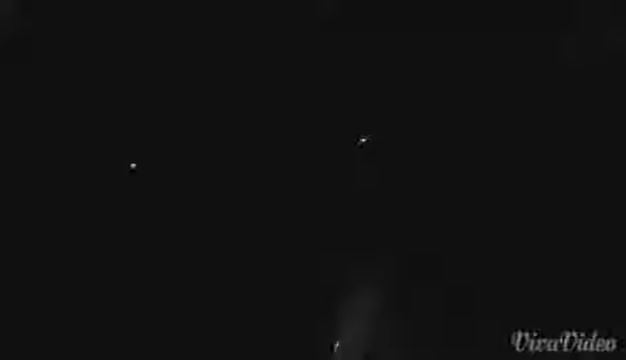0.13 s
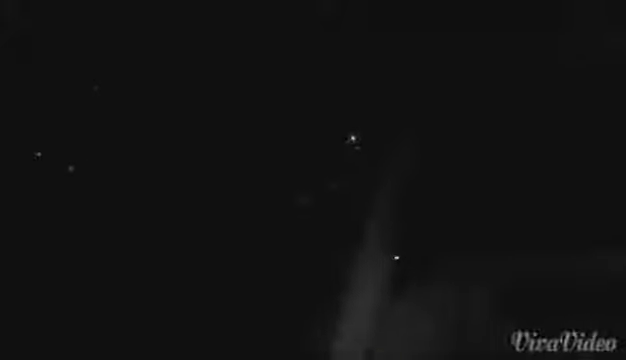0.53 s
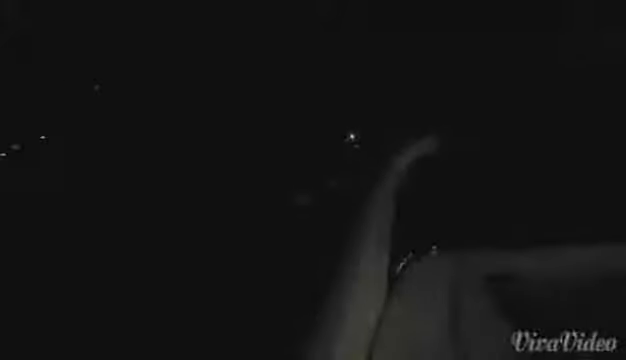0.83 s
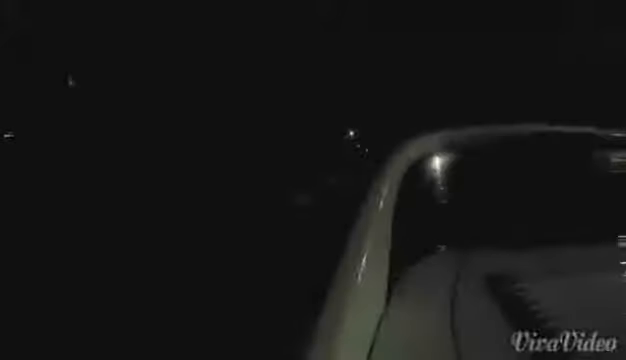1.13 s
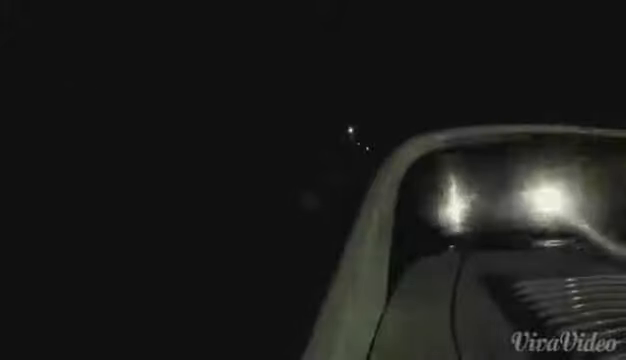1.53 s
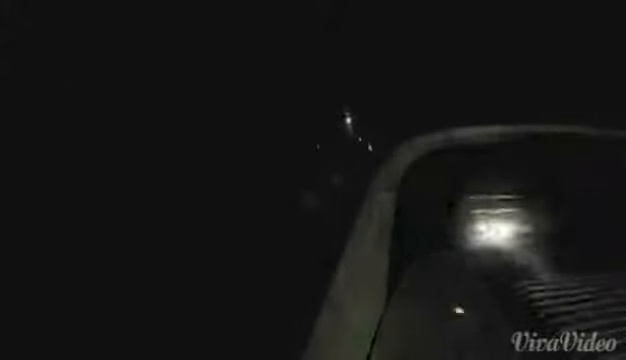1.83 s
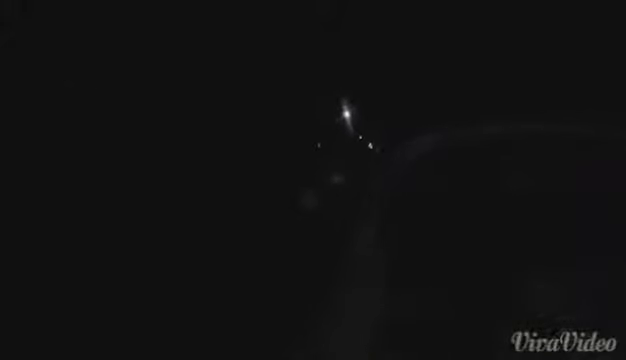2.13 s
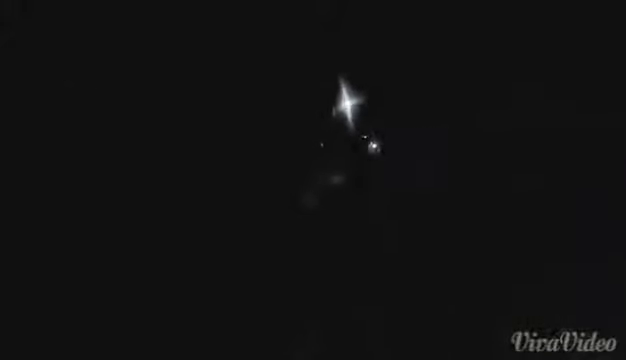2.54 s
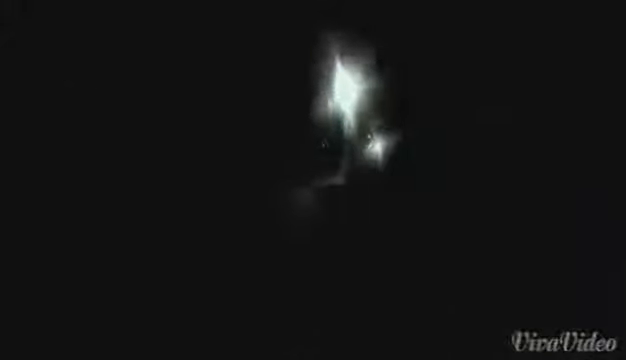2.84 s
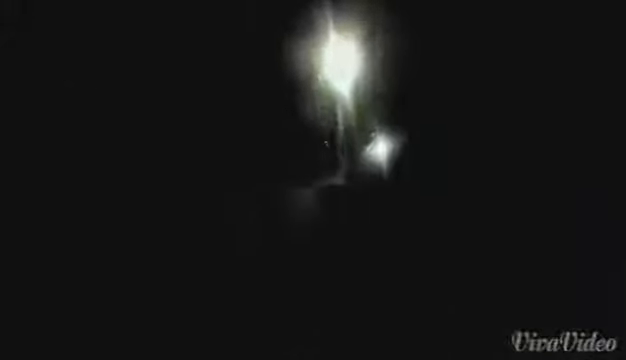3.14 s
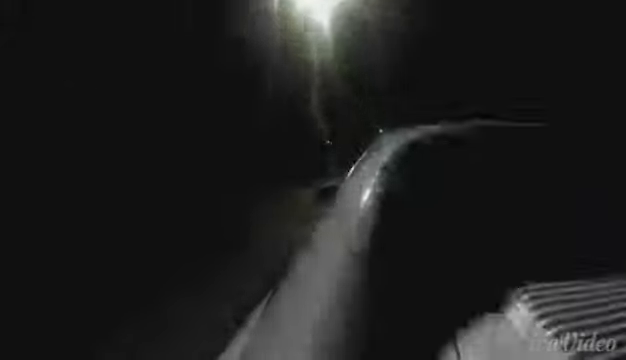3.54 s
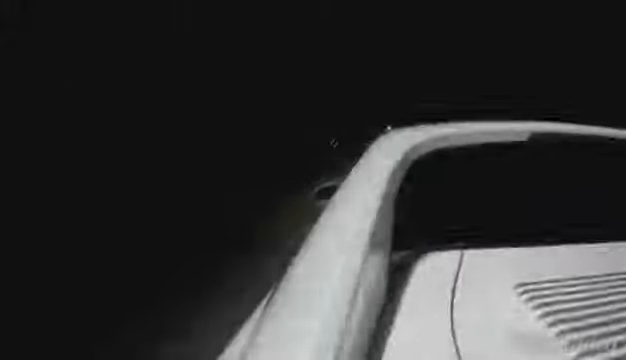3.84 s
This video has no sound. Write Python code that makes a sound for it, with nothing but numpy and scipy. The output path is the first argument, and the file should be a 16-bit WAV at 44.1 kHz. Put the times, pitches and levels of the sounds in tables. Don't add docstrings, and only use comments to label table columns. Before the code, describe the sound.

Car engine booming inside a cabin at night, wind roaring, turbo flutter chattering between pulls

```python
import sys
import numpy as np
from scipy import signal
from scipy.fft import rfft, irfft
from scipy.io import wavfile
from scipy.ndimage import uniform_filter1d

SR = 44100
rng = np.random.default_rng(int(sys.argv[2]) if len(sys.argv) > 2 else 0)


def invert_db(x):
    u = np.asarray(x, float) / 20
    return 10 ** u


def log_audio(samples):
    frames = np.atleast_2d(samples).T
    limited = np.clip(frames, -1, 1)
    pcm = np.round(limited * 32767).astype(np.int16)
    wavfile.write(sys.argv[1], SR, pcm)


N = 175077

# time in seconds, four-stroke cycles in Hz.
ENGINE_SPEED = [(.12, 21.72), (.35, 23.72), (.6, 25.83), (.85, 28.83), (1.1, 31.97), (1.43, 37.1),
                (1.78, 45.95), (1.87, 41.14), (2.08, 36.47), (2.3, 33.8), (2.5, 31.44), (2.62, 30.95),
                (2.69, 26.4), (2.85, 29.15), (2.92, 28.57), (3.0, 29.96), (3.81, 36.93), (3.97, 34.7)]
# time in seconds, firing tone in dB, other orders in dB.
ENGINE_LOAD = [(.12, -24.5, -28.5), (.32, -30, -22), (.62, -13, -21), (.76, -24, -21), (1.0, -15, -16.5),
               (1.21, -10.5, -18.5), (1.46, -9, -21.5), (1.6, -17.5, -26), (1.8, -22, -21.5),
               (1.95, -15, -36.5), (2.15, -16, -24), (2.6, -31, -26), (2.7, -20.5, -23.5), (3.1, -27, -15),
               (3.35, -9.5, -17), (3.74, -11.5, -23), (3.85, -14, -33.5), (3.89, -23, -52)]
# multiple of the cycle rate, level
# in dB.
OTHER_ORDERS = [(3, -12), (5, -7), (6, -10.5), (7, -5.5), (8, 1.5), (9, -5.5), (10, 0), (11, -10),
                (12, -6.5), (13, -9.5), (14, -7), (15, -13), (16, -8.5), (17, -14), (18, -15.5), (19, -22),
                (21, -12), (22, -17), (23, -11), (24, -16), (26, -8), (28, -9.5)]
# middle in seconds, pitch in Hz, level in dB.
EXHAUST_BURBLES = [(0.15, 174.7, -17.5), (0.19, 181, -19), (0.179, 140.8, -16.5), (.62, 142, -23),
                   (.93, 141.6, -23), (2.23, 140.3, -6.5), (2.349, 134.8, -11.5), (2.444, 127.5, -13.5),
                   (2.518, 128.9, -9), (2.591, 129.1, -12.5), (2.711, 134.8, -14.5), (2.785, 135.3, -10),
                   (2.86, 141.8, -14.5), (2.947, 135, -15.5), (3.161, 133.1, -13.5), (2.31, 276, -26),
                   (.65, 214, -18), (.71, 216.2, -19), (.45, 98.3, -19), (.96, 211, -18),
                   (1.0, 242.6, -16.5), (3.052, 147.8, -14.5), (3.08, 210.1, -18), (0.439, 214, -19.5),
                   (1.021, 214, -15), (1.403, 214, -15), (3.761, 214, -23)]
# middle in seconds, pitch in Hz, level in dB.
PANEL_SHUDDERS = [(.3, 705, -45), (.61, 705, -35.5), (.935, 712, -32.5), (.99, 712, -36), (1.96, 695, -34),
                  (2.2, 712, -37.5), (2.3, 695, -34.5), (2.72, 705, -37.5), (2.81, 703, -33.5),
                  (2.88, 705, -36), (2.975, 712, -32), (3.23, 700, -33.5), (3.89, 690, -45),
                  (3.855, 600, -36.5), (.35, 350, -28.5), (.58, 360, -26.5), (.9, 455, -37),
                  (1.22, 470, -28.5), (1.639, 468, -38), (2.68, 452, -30.5), (2.81, 468, -26),
                  (2.95, 466, -24.5), (3.14, 466, -25.5), (3.2, 462, -26), (3.27, 511, -30),
                  (3.47, 470, -30.5), (2.73, 420, -29), (2.72, 330, -25), (0.199, 350, -29.5),
                  (.72, 440, -32), (2.039, 370, -30)]
# pitch in Hz, width in Hz, level in dB.
CABIN_MODES = [(85.7, 17.4, 0), (142.5, 12.8, 5.5), (214, 7.75, 3.5), (278, 26, -2.5), (327, 54.5, -5.5),
               (460, 86, -6.5), (508.2, 60, -7.5), (700, 18, -13.5), (590, 81, -22.5)]
# time in seconds, level in dB, brightness in dB per octave.
WIND_ROAR = [(.12, -39, -2.5), (.35, -37.5, -1.5), (.7, -33.5, -1), (1, -32, -1), (1.25, -34, -2),
             (1.55, -35, -3), (1.75, -29, -2), (1.95, -31, -2), (2.2, -33, -1.5), (2.45, -35, -3.5),
             (2.6, -35.5, -0.5), (2.85, -32, -1.5), (3.15, -28, -1.5), (3.4, -31.5, 0.5), (3.7, -35.5, 1),
             (3.85, -34.5, -1.5), (3.97, -36.5, -2)]
# frequency in Hz, density in dB per Hz.
WIND_COLOUR = [(320, -6), (550, -25), (707, -1), (860, -15), (1170, -9), (3200, -11), (5140, -19),
               (6250, -24), (15500, -42)]
# time in seconds, level in dB.
WINDOW_BUFFET = [(0.12, -40), (0.13, -35), (0.56, -30), (0.68, -34), (0.97, -26), (1.77, -45), (1.88, -38),
                 (2.01, -42), (2.23, -26), (2.52, -37), (2.55, -24), (2.8, -25), (2.98, -28), (3.97, -37)]
# middle in seconds, body in dB, thin hiss in dB, half length in seconds.
SURGE_PUFFS = [(1.351, -45, -43, 0.011), (1.405, -50, -43, 0.035), (1.501, -60, -44, 0.027),
               (1.576, -54, -44, 0.027), (1.647, -46, -43, 0.027), (1.78, -35.5, -37, 0.024),
               (1.81, -47, -46, .012), (1.891, -39, -39, 0.026), (1.972, -38.5, -38, 0.03),
               (2.05, -43, -39, 0.018), (2.136, -42, -40, 0.017), (2.214, -39, -39, 0.025),
               (2.292, -37, -39.5, 0.015), (2.356, -37, -38.5, .013), (2.433, -44, -47, 0.014),
               (2.49, -39, -58, .012), (2.589, -37, -49, 0.013), (2.986, -40.5, -58, .025),
               (3.077, -35, -44, 0.037), (3.294, -46, -42, .015), (3.344, -34, -42, 0.012),
               (3.773, -40, -40, 0.029), (3.821, -35.5, -40, 0.021), (3.908, -37, -41.5, 0.029)]
# frequency in Hz, density in dB per Hz.
SURGE_COLOUR = [(500, -58), (1100, 12.5), (1900, 8.5), (3500, 6.5), (7500, -10), (11000, -7.5),
                (14500, -17.5), (16000, -8)]
# middle in seconds, pitch in Hz, level in dB.
PIPE_NOTES = [(1.788, 700, -27.5), (1.825, 1150, -32.5), (1.83, 1920, -35), (1.879, 688.4, -32),
              (1.903, 1150, -29), (1.984, 1108, -30.5), (2.016, 500, -21), (2.063, 1007, -34),
              (2.102, 460, -18.5), (2.145, 451.3, -25), (2.07, 488, -26), (2.328, 396, -27),
              (1.869, 1150, -37), (1.965, 1150, -40), (1.94, 1534, -43.5), (1.99, 1650, -40),
              (2.15, 1057, -41), (2.188, 411, -24), (2.246, 414, -26), (2.292, 442, -21),
              (2.37, 383.6, -21.5), (2.37, 721, -34), (2.44, 682, -41), (2.444, 319, -37),
              (2.497, 1445, -36), (3.81, 707, -30), (3.834, 1170, -48), (3.891, 1821, -35),
              (3.92, 1150, -32.5), (3.949, 515, -27)]
# centre in Hz, width in
# Hz, gain in dB.
MIC_COLOUR = [(1150, 58, 4), (1535, 335, 5.5), (2380, 530, -2.5), (3803, 182, 9.5), (4280, 130, 3),
              (4750, 850, -10.5), (6147, 296, 11.5), (8000, 640, 3.5), (936, 90, 3), (11400, 940, 3),
              (4230, 55, -9), (5570, 180, 4),
              (828, 6.5, 9), (1011, 7.2, 7), (1404, 60, 2.5), (1574, 18, 5.5), (1806, 21, 4.5),
               (1983, 35, 4.5), (2545, 27, 3.5), (2745, 63, 2.5), (3260, 130, 5.5), (3500, 4.3, 2),
               (3640, 4.5, 11), (1272, 45, -5.5)]


def unit(x):
    return x / np.sqrt(np.mean(x ** 2) + 1e-20)


def in_time(rows):
    s, *columns = np.transpose(rows)
    return [np.interp(np.arange(N) / SR, s, column) for column in columns]


def drift(rate_hz):
    r = np.exp(-80 * np.pi * rate_hz / SR)
    chance = rng.standard_normal(N // 40 + 2002)
    slow = signal.lfilter([1], [1, -2 * r, r * r], chance)[2000:]
    return np.interp(np.arange(N) / 40, np.arange(len(slow)), unit(slow))


def resonance(x, hz, width_hz):
    r = np.exp(-np.pi * width_hz / SR)
    poles = [1, -2 * r * np.cos(2 * np.pi * hz / SR), r * r]
    return signal.lfilter([(1 - r * r) / 2, 0, (r * r - 1) / 2], poles, x)


def double_resonance_noise(hz, width_hz):
    once = resonance(rng.standard_normal(N), hz, width_hz)
    return resonance(once, hz, width_hz)


def cabin(x):
    out = 0
    for k, (hz, width_hz, db) in enumerate(CABIN_MODES):
        out = out + (-1) ** k * invert_db(db) * resonance(x, hz, width_hz)
    return out


def whistle(s, hz, db, length_s, sag=0, waver=0):
    near = slice(max(int((s - 5 * length_s) * SR), 0), int((s + 5 * length_s) * SR))
    u = (np.arange(N)[near] / SR - s) / length_s
    pitch_hz = hz * (1 - sag * u / 2 + (waver + np.zeros(N))[near])
    phase = 2 * np.pi * np.cumsum(pitch_hz) / SR
    out = np.zeros(N)
    out[near] = invert_db(db) * np.exp(-u * u / 2) * np.sqrt(2) * np.sin(phase)
    return out


def air(colour, patchy_db, together_db, tilt_db=0):
    hz, density_db = np.transpose(colour)
    grid = np.fft.rfftfreq(N, 1 / SR) + 1
    colour_gain = invert_db(np.interp(np.log(grid), np.log(hz), density_db))
    noise = irfft(rfft(rng.standard_normal((2, N))) * colour_gain, N)
    together = together_db * (drift(6.7) + drift(36))
    edges = 400 * 2 ** (np.arange(17) / 3)
    out = 0
    for k, (low, high) in enumerate(zip(edges, edges[1:])):
        sos = signal.butter(2, [low, high], "band", fs=SR, output="sos")
        band = signal.sosfilt(sos, noise[k % 2])
        alone = patchy_db * (0.5 + k / 10) * drift(28.0)
        brightness = tilt_db * max(np.log2(low / 2000), 0)
        out = out + band * invert_db(together + alone + brightness)
    return out / noise.std()


def engine():
    (cycle_hz,) = in_time(ENGINE_SPEED)
    firing_db, others_db = in_time(ENGINE_LOAD)
    cycle = 2 * np.pi * np.cumsum(cycle_hz) / SR
    firing = np.sqrt(2) * invert_db(firing_db + 1.6 * drift(12)) * np.sin(4 * cycle)
    orders = 0
    for k, db in OTHER_ORDERS:
        wobble_db = 2.0 * drift(4)
        orders = orders + invert_db(db + wobble_db) * np.sin(int(k) * cycle + rng.uniform(0, 2 * np.pi))
    others = cabin(invert_db(others_db + 3) * orders)
    burbles = sum(whistle(s, hz, db, length_s=0.024) for s, hz, db in EXHAUST_BURBLES)
    shudders = sum(whistle(s, hz, db, length_s=0.026) for s, hz, db in PANEL_SHUDDERS)
    return firing + burbles + shudders + others, 4 * cycle


def road_and_wind(firing_phase):
    roar_db, tilt_db = in_time(WIND_ROAR)
    rumble_db = -25 + 0.38 * (roar_db - roar_db.mean()) + 2.0 * drift(24)
    rumble = unit(cabin(rng.standard_normal(N))) * invert_db(rumble_db)
    roar = air(WIND_COLOUR, patchy_db=1.47, together_db=0.18, tilt_db=tilt_db) * invert_db(roar_db + 1.5)
    roar = roar * (1 + 0.038 * np.sin(firing_phase))
    buffet = double_resonance_noise(hz=20, width_hz=8)
    buffet = buffet / np.sqrt(uniform_filter1d(buffet ** 2, size=4000) + 1e-12)
    (buffet_db,) = in_time(WINDOW_BUFFET)
    return rumble + roar + buffet * invert_db(buffet_db)


def surge_puffs():
    t = np.arange(N) / SR
    s, body_db, hiss_db, half_s = np.transpose(SURGE_PUFFS)
    opening = np.exp(-np.abs((t[:, None] - s) / half_s) ** 4)
    blow = air(SURGE_COLOUR, patchy_db=1.0, together_db=1.03) * invert_db(3.5)
    body = signal.sosfilt(signal.butter(4, 6000, "low", fs=SR, output="sos"), blow)
    hiss = signal.sosfilt(signal.butter(4, 6000, "high", fs=SR, output="sos"), blow)
    return body * (opening @ invert_db(body_db)) + hiss * (opening @ invert_db(hiss_db))


def pipe_notes():
    waver = 0.022 * drift(70)
    notes = sum(whistle(s, hz, db, 0.014, sag=0.07, waver=waver) for s, hz, db in PIPE_NOTES)
    return notes * invert_db(2.5 * drift(58))


def turbine():
    middle_s, length_s = 3.53, 0.17
    t = np.arange(N) / SR
    tone = unit(double_resonance_noise(hz=4560, width_hz=170))
    return tone * invert_db(-42) * np.exp(-((t - middle_s) / length_s) ** 4)


def scene():
    engine_sound, firing_phase = engine()
    surge = surge_puffs() + pipe_notes() + turbine()
    return (engine_sound + road_and_wind(firing_phase) + surge)[None]


def low_pass(x):
    return signal.sosfilt(signal.butter(12, 15250, fs=SR, output="sos"), x)


def record(dry):
    mirrored = np.hstack([dry, dry[:, ::-1]])
    grid = np.fft.rfftfreq(2 * N, 1 / SR)
    colour_db = sum(db * np.exp(-((grid - hz) / width_hz) ** 2 / 2)
                    for hz, width_hz, db in MIC_COLOUR)
    x = irfft(rfft(mirrored) * invert_db(colour_db), 2 * N)[:, :N]
    limit = 1.1
    x = limit * np.tanh(x / limit)
    x = signal.sosfilt(signal.cheby2(12, 60, 16600, fs=SR, output="sos"), x)
    start_s, fade_s = 0.1145, 0.0059
    since = np.arange(N) / SR - start_s
    fade = np.clip(0.075 + since / fade_s, 0, 1)
    click = 0.15 * np.exp(-np.abs(since) / 0.0015)
    return low_pass((since > 0) * (x * fade + click))


dry = scene()
out = record(dry)
log_audio(out)
```